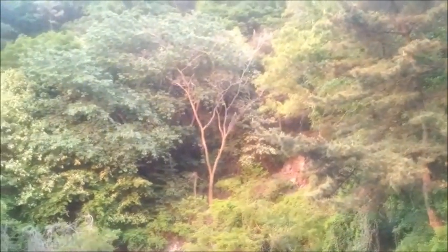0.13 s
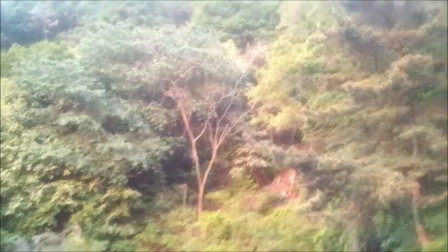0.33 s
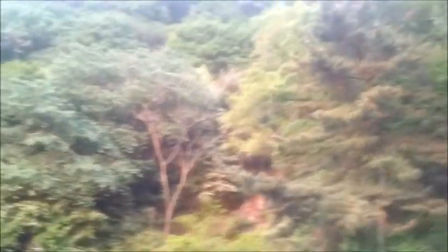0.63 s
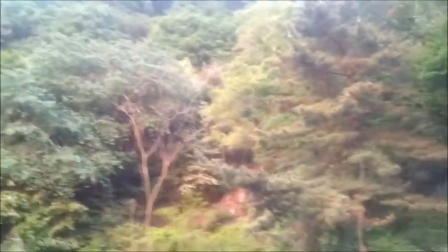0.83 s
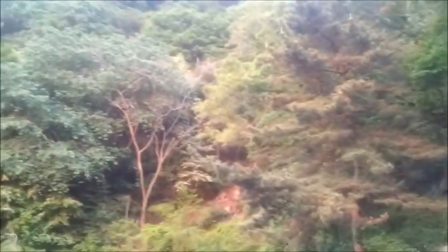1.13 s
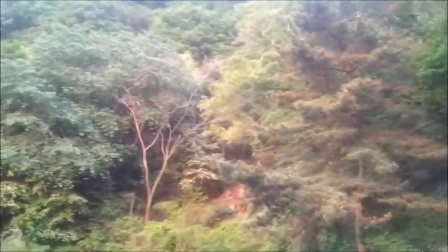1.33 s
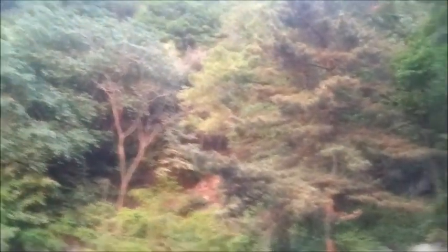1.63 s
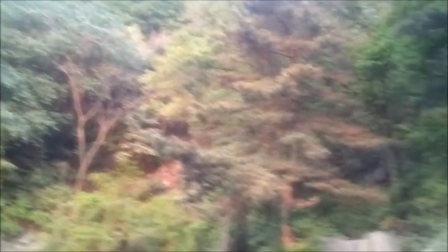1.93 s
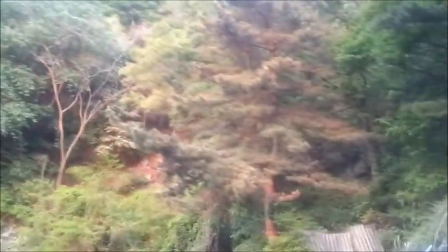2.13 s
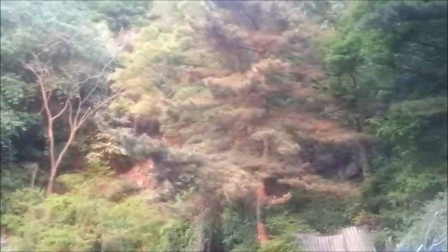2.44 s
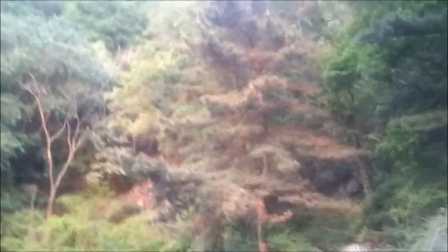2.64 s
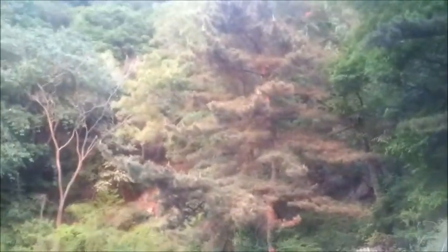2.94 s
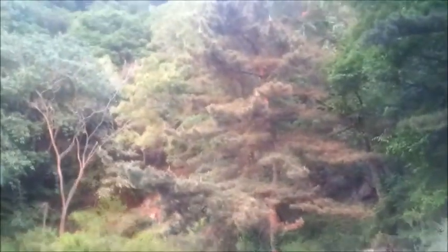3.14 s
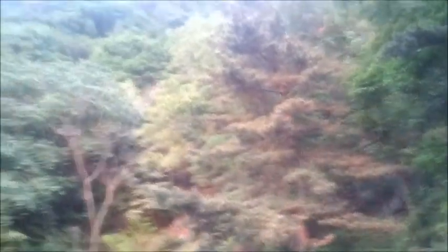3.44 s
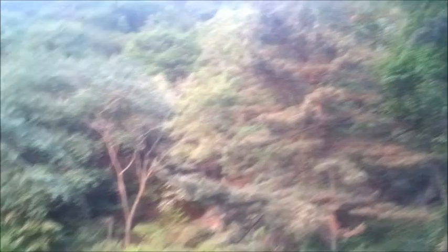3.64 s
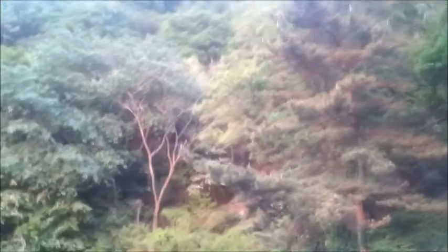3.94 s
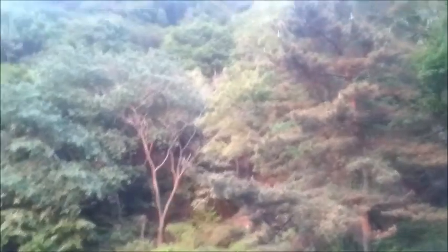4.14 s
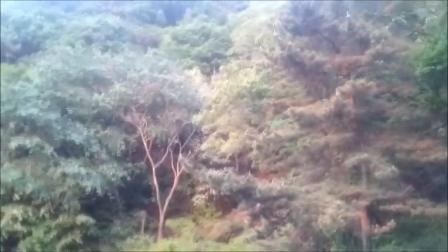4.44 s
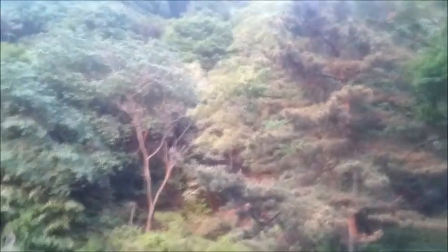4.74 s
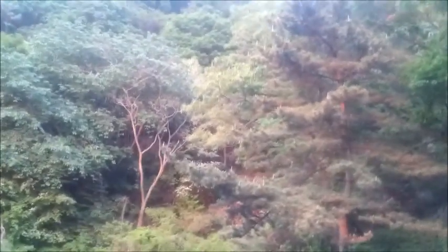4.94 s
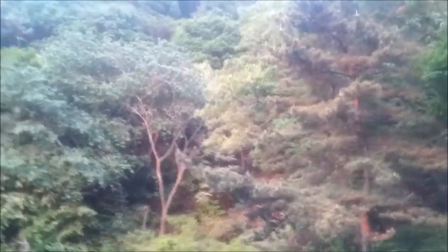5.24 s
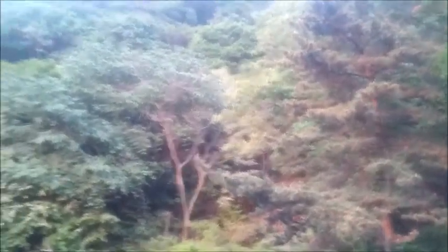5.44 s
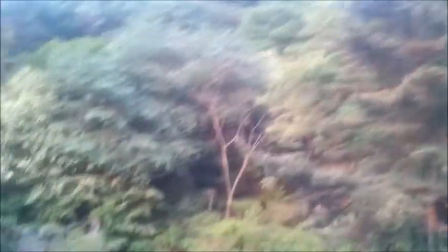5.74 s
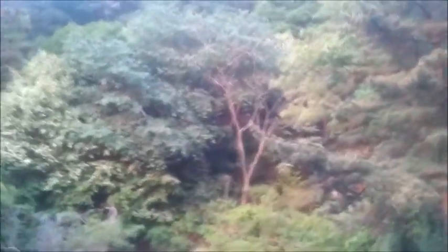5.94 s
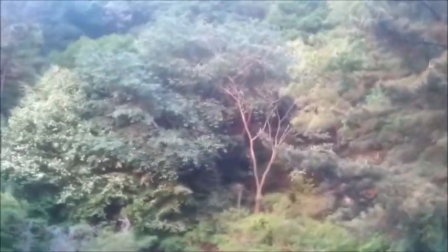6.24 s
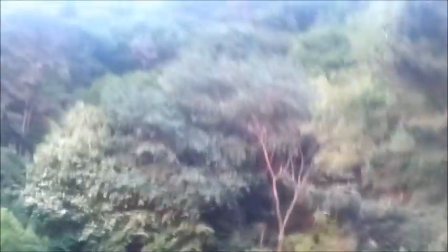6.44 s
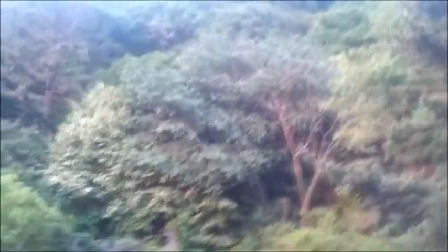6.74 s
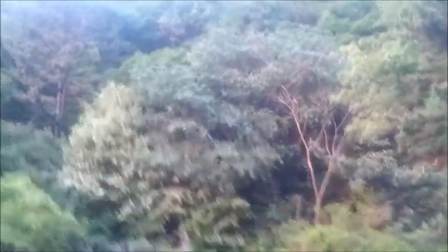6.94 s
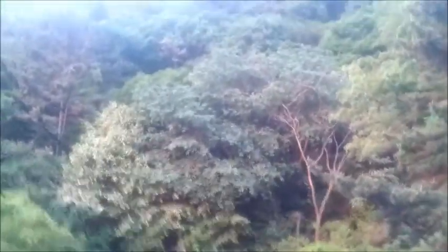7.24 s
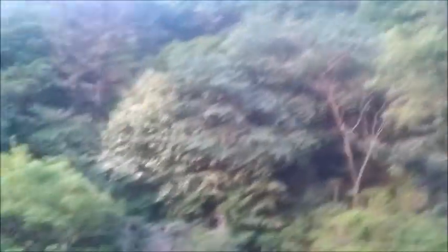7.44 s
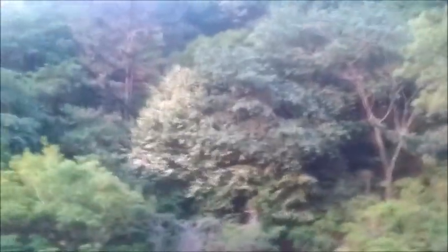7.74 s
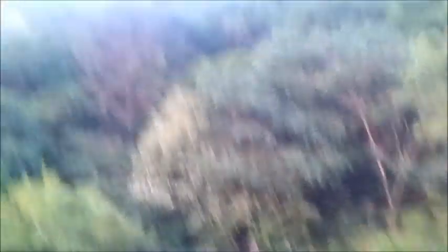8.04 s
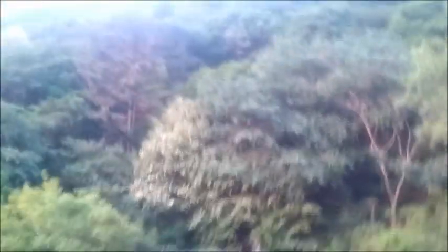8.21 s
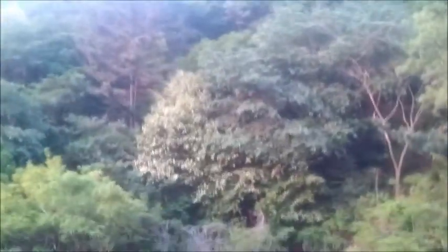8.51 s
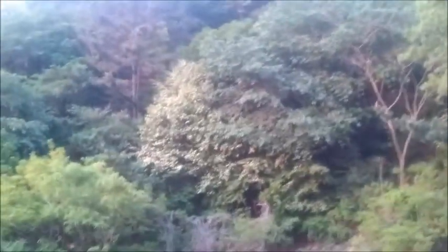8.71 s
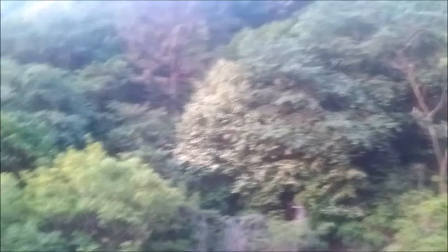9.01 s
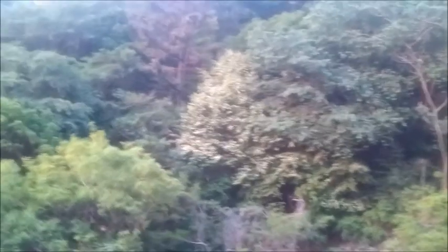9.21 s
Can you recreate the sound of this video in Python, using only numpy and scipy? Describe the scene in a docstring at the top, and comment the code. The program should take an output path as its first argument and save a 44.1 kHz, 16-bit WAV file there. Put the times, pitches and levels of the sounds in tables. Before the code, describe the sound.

Outdoor woodland birdsong through a modest, narrow-sounding handheld microphone. Sharp chirps, sliding whistles and falling slurs overlap, leaving a grainy echo from trunks and leaves. Early on one clear singer repeats its phrase; the middle is sparser with a soft microphone bump; then bright trills burst out above hoarse double scolds and a close tick. Buzzing notes and a faint low rustle end it, over quiet air and distant bird wash.

```python
"""A wooded hillside in the morning, with small birds singing over one another, near and far.
Each note is a gliding whistle or a buzz, scattered by trunks and leaves into a grainy tail.
Under them lie the shaped-noise hush of the valley, a faint drone and the wash of distant birds.
A larger bird scolds in pairs of pulsed-noise rasps; close by come three ticks and a low rustle.
A decaying low sine makes a soft bump on the microphone."""
import sys
import numpy as np
from scipy import signal
from scipy.fft import rfft, irfft, next_fast_len
from scipy.io import wavfile

SR = 44100
rng = np.random.default_rng(int(sys.argv[2]) if len(sys.argv) > 2 else 0)


def transcribe(signal):
    """Save signal, clipped to [-1, 1], as a 16-bit WAV file at the path in sys.argv[1]."""
    frames = np.atleast_2d(signal).T
    limited = np.clip(frames, -1, 1)
    pcm = np.round(limited * 32767).astype(np.int16)
    wavfile.write(sys.argv[1], SR, pcm)


N = 413216
TIME = np.arange(N) / SR


def from_db(db):
    """Decibels to amplitude gain."""
    return 10 ** (np.asarray(db) / 20)


def rms_one(x):
    """Scale to an rms of 1."""
    return x / np.sqrt(np.mean(x ** 2) + 1e-20)


def level(rows):
    """Gain over time, straight in dB between rows of time in seconds and level in dB."""
    return from_db(np.interp(TIME, *np.transpose(rows)))


def band(x, low_hz, high_hz, order=2):
    """Butterworth band-pass."""
    return signal.sosfilt(signal.butter(order, [low_hz, high_hz], "band", fs=SR, output="sos"), x)


def wander(size, rate):
    """Random drift about zero: straight lines between normal draws, `rate` draws a second."""
    steps = np.arange(size) * rate / SR
    return np.interp(steps, np.arange(4096), rng.standard_normal(4096))


def coloured(spectrum):
    """Noise of rms 1, shaped by rows of frequency in Hz and relative density in dB."""
    hz, db = np.transpose(spectrum)
    size = next_fast_len(N)
    bins = np.maximum(np.fft.rfftfreq(size, 1 / SR), 1)
    gain = from_db(np.interp(np.log(bins), np.log(hz), db))
    white = rfft(rng.standard_normal(size))
    return rms_one(irfft(white * gain, size)[:N])


def add(track, s, sound):
    """Mix a sound in at time s, cut off at the end of the track."""
    start = max(0, round(s * SR))
    part = sound[:max(0, N - start)]
    track[start:start + len(part)] += part


def woodland(x, t60, early_t60, late_db, onset_s=0.0051):
    """Near trunks throw back separate echoes; the leafy slope adds a dense tail at late_db beside them."""
    t = np.arange(SR) / SR
    hits = rng.standard_normal(SR) * (rng.random(SR) < 350 / SR)   # about 350 echoes a second
    trunks = hits * from_db(-60 * t / early_t60)
    leaves = rng.standard_normal(SR) * from_db(-60 * t / t60)
    onset = 1 - np.exp(-(t / onset_s) ** 2)
    response = rms_one(trunks * onset) + from_db(late_db) * rms_one(leaves * onset)
    unit_energy = rms_one(response) / np.sqrt(SR)
    return signal.fftconvolve(x, unit_energy)[:N]


def syrinx(pitch, waver, flutter_db, taper):
    """One note of rms 1: a nearly pure tone, a little unsteady in pitch and strength."""
    size = len(pitch)
    phase = 2 * np.pi * np.cumsum(pitch * (1 + waver * wander(size, 300.7))) / SR
    edges = signal.windows.tukey(size, np.clip(taper, .1, 1))
    swell = edges * from_db(flutter_db * wander(size, 120))
    return rms_one(swell * np.sin(phase))


def whistler(notes, waver, flutter_db, taper, rise_db, octave_db, bounce_db, echo_db, t60, early_t60, late_db):
    """Glides a smooth curve through each note's pitches; strength shifts by rise_db in all and octave_db an octave.

    Each note: start in seconds, length in seconds, level in dB, echo in dB, then pitches in Hz at even steps.
    """
    direct, scattered = np.zeros(N), np.zeros(N)
    for s, length, db, wet_db, *pitches in notes:
        along = np.linspace(0, 1, round(length * SR))
        glide = np.polyfit(np.linspace(0, 1, len(pitches)), pitches, len(pitches) - 1)
        pitch = np.polyval(glide, along)
        effort = from_db(rise_db * along + octave_db * np.log2(pitch / pitch.mean()))
        note = from_db(db) * rms_one(effort * syrinx(pitch, waver, flutter_db, taper))
        add(direct, s, note)
        # branches round the perch return the note within milliseconds, so fast sweeps beat against themselves
        for lag in rng.uniform(.002, 0.013, size=2):
            add(direct, s + lag, note * from_db(wet_db + bounce_db))
        add(scattered, s, note * from_db(wet_db + echo_db))
    return direct + woodland(scattered, t60, early_t60, late_db)


def valley():
    """Shaped noise for the low hush and for distant birds blurred into a wash; a narrow noise band for the drone."""
    # Each row: frequency in Hz, relative density in dB.
    hush_spectrum = [(15, -41.5), (25, -10), (76, 0.5), (289, -0.5), (452, -2.5), (549, -4), (2600, -14),
                     (3380, -36.5), (5720, -120)]
    wash_spectrum = [(1500, -16.5), (2400, -6), (3100, 4), (4100, 5.5), (5200, 5), (6300, 2), (7200, -7)]
    # Each row: time in seconds, level in dB; hush and wash are trimmed below.
    hush_course = [(0, -58), (.6, -60), (4, -59.5), (9.37, -60.5)]
    wash_course = [(0, -69), (.85, -72.5), (1.4, -69), (2.5, -70.5), (3.1, -67), (4.3, -68.5), (4.7, -71),
                   (5.75, -71), (6.5, -65.5), (8.2, -66), (9.37, -70)]
    hum_course = [(0, -69.5), (5.5, -71), (7, -84)]
    hum_hz = 442.7
    hush = from_db(1.0) * level(hush_course) * coloured(hush_spectrum)
    hum = level(hum_course) * rms_one(band(rng.standard_normal(N), hum_hz - 9, hum_hz + 9))
    wash = from_db(8.0) * level(wash_course) * coloured(wash_spectrum)
    return hush + hum + wash


def handling():
    """Filtered clicks tick close by, a fast-decaying sine bumps the microphone and a noise band rustles low."""
    # Each row: time in seconds, peak in dB.
    tick_rows = [(0.536, -39), (7.469, -28.5), (8.921, -40)]
    # Low rustle close by. Each row: time in seconds, level in dB.
    rustle_course = [(0, -99), (9.1, -95), (9.24, -58.5), (9.37, -72)]
    bump_s, bump_db, bump_hz, bump_t60_s = 4.797, -40.5, 86, 0.039
    out, t = np.zeros(N), np.arange(SR // 4) / SR
    snap = band(signal.unit_impulse(len(t)), 850, 3200)
    for s, db in tick_rows:
        add(out, s, from_db(db) * snap / np.abs(snap).max())
    add(out, bump_s, from_db(bump_db - 60 * t / bump_t60_s) * np.sin(2 * np.pi * bump_hz * t))
    return out + level(rustle_course) * rms_one(band(rng.standard_normal(N), 240, 380))


def chatter(loudest_db, centre_hz, spread_octaves, count):
    """Birds deep in the wood slur up or down at random and are heard mostly as echo."""
    out = np.zeros(N)
    for k, (when, span, height, slope, soft) in enumerate(rng.random((count, 5))):
        along = np.linspace(-.5, .5, round((.02 + 0.044 * span) * SR))
        glide_octaves = .6 * (slope - .5) + 0.14 * np.sign(slope - .5)   # never level
        octaves = spread_octaves * (height - .5) + glide_octaves * along
        note = syrinx(centre_hz * 2 ** octaves, waver=.015, flutter_db=5.0, taper=0.46)
        s = (k + when) / count * N / SR   # one note in each equal slot
        add(out, s, from_db(loudest_db - 8.3 * soft) * note)
    return from_db(-4.5) * out + woodland(out, t60=0.25, early_t60=0.47, late_db=-5.0)


def buzzers():
    """Far birds swing their pitch about a hundred times a second; much of it arrives as echo."""
    # Each row: start in seconds, length in seconds, level in dB before the direct and echo trims,
    # start pitch in Hz, end pitch in Hz, swing to either side in Hz, swings per second.
    buzz_rows = [(2.015, 0.11, -52.5, 4054, 4920, 420, 115), (2.05, 0.16, -55.5, 5430, 5920, 480, 146),
                 (4.247, 0.18, -56.5, 5130, 4980, 600, 82), (6.278, .16, -52, 4230, 4590, 360, 150),
                 (6.404, 0.089, -48, 4500, 4680, 340, 135), (6.336, 0.21, -51.5, 5270, 6000, 585, 88),
                 (8.564, 0.16, -43.5, 5225, 4654, 190, 146), (8.766, .195, -43, 5030, 4894, 220, 147),
                 (9.011, .14, -45, 5080, 4910, 250, 153), (9.182, 0.036, -41.5, 5170, 5020, 190, 125),
                 (9.225, 0.083, -43, 4987, 5045, 252, 127), (9.332, 0.041, -47.5, 5220, 5100, 220, 130)]
    out = np.zeros(N)
    for s, length, db, start_hz, end_hz, swing_hz, rate in buzz_rows:
        size = round(length * SR)
        cycle = 2 * np.pi * np.cumsum(rate * (1 + 0.061 * wander(size, 60))) / SR
        pitch = np.linspace(start_hz, end_hz, size) + swing_hz * np.sin(cycle)
        pulsing = from_db(-4 * np.cos(cycle))   # each down-stroke is the loud half of a swing
        note = rms_one(pulsing * syrinx(pitch, waver=0.0091, flutter_db=3.5, taper=0.2))
        add(out, s, from_db(db) * note)
    return from_db(-5.5) * out + from_db(-2.5) * woodland(out, t60=0.72, early_t60=0.65, late_db=0.0)


def rasps():
    """A larger bird scolds in pairs of hoarse bursts: band-limited noise pulsing 330 times a second."""
    # Each row: start of a pair in seconds, level of its second burst in dB.
    rasp_pairs = [(7.365, -56.5), (7.608, -58), (7.853, -57), (8.1, -57)]
    burst_s, gap_s, first_burst_db = 0.035, .058, -2.5
    out, t = np.zeros(N), np.arange(round(burst_s * SR)) / SR
    pulses = 1 + np.cos(2 * np.pi * 330 * t)
    edges = signal.windows.tukey(len(t), .5)
    for s, db in rasp_pairs:
        for after, gain_db in ((0, first_burst_db), (gap_s, 0)):
            air = rng.standard_normal(len(t)) * pulses * edges
            add(out, s + after, from_db(db + gain_db) * rms_one(band(air, 1450, 2640, order=3)))
    return out + woodland(out, t60=0.98, early_t60=0.31, late_db=-5.0)


def far_calls():
    """Notes of two far birds with two-note calls: one slips down very high, one whistles low and level."""
    # Thin high pairs. Each row: start in seconds, level in dB before the mix.
    slip_rows = [(.409, -61.5), (.813, -58), (1.252, -57.5), (1.698, -59), (2.16, -62), (6.22, -66.5)]
    # Low calls. Each row: start in seconds, level in dB before the note gain and the mix.
    low_calls = [(.458, -60), (5.385, -68)]
    # Notes of a low call. Each row: delay in seconds, gain in dB, pitch in Hz.
    low_call_notes = [(0, 3, 1967), (.086, 2, 2430)]
    slip_gap_s, slip_s, slip_echo_db, slip_hz = 0.032, .022, 0.5, (7380, 6900, 6080)
    low_note_s, low_echo_db = 0.055, -7
    notes = []
    for s, db in slip_rows:
        for k in range(2):
            notes.append((s + k * slip_gap_s, slip_s, db, slip_echo_db, *slip_hz))
    for s, db in low_calls:
        for after, gain_db, hz in low_call_notes:
            notes.append((s + after, low_note_s, db + gain_db, low_echo_db, hz, hz))
    return notes


def chorus():
    """Single notes from all over the slope: each bends its kind's shape between its own two pitches."""
    # Each row: start in seconds, length in seconds, level in dB, echo in dB, first and second pitch in Hz.
    arched_chips = [(2.423, .038, -45, -5.5, 3730, 3940), (2.477, 0.03, -45.5, -9.5, 3900, 4760),
                    (2.797, 0.029, -46, -8, 4120, 4860), (3.096, 0.035, -47, -9, 4140, 4790),
                    (5.997, .033, -48, -5, 3910, 4760), (7.4, .026, -44, -0.5, 4260, 4760),
                    (7.915, .068, -55, -9, 4690, 5210), (8.247, 0.069, -56, -6, 3950, 5010)]
    dipping_whistles = [(2.384, .062, -52, -3.5, 3860, 3670), (3.986, 0.064, -49.5, -3, 4140, 3920),
                        (5.799, 0.047, -52.5, -4.5, 4850, 4670), (5.89, .036, -47, -14, 6450, 6050),
                        (6.428, 0.04, -45.5, -12.5, 6040, 5780), (9.232, 0.032, -58, -6, 6020, 5600)]
    upward_sweeps = [(0.222, .053, -65, -8, 3430, 4170), (0.425, .057, -52, -8, 5350, 5980),
                     (0.614, 0.032, -53, -2.5, 3950, 4850), (0.922, .014, -45.5, -3, 5300, 6270),
                     (1.956, 0.036, -49, -5, 4150, 4750), (2.227, 0.05, -51, -17.5, 5290, 5590),
                     (3.09, 0.024, -52.5, -10.5, 5420, 5920), (3.145, .03, -57, -14, 5200, 5650),
                     (3.259, 0.012, -61, -11, 4700, 5940), (3.295, .013, -58, -5, 4780, 5970),
                     (4.073, .013, -57.5, -5, 5010, 5920), (4.245, .026, -61, -6, 5800, 6170),
                     (4.796, 0.037, -45, -6, 3510, 4410), (4.797, .02, -58, -2, 2850, 3430),
                     (5.709, 0.078, -68, 4, 4400, 5720), (9.267, 0.0293, -60, -7, 5640, 6140),
                     (5.837, 0.044, -55, -6, 4700, 6600), (7.807, .052, -63.5, 5, 3860, 4670)]
    falling_slurs = [(1.759, .047, -44.5, -5.5, 5570, 4280), (3.115, .093, -65.5, -7.5, 2060, 1550),
                     (3.423, 0.067, -50.5, -3, 5600, 4410), (3.613, 0.073, -49.5, -1, 5410, 4480),
                     (4.95, 0.12, -62.5, -7, 4280, 3690), (5.247, 0.061, -65, -6, 7700, 6900),
                     (5.299, 0.0414, -57.5, -8.5, 6780, 6380), (6.025, .035, -56, 0, 4600, 3650),
                     (6.049, 0.038, -58, -4.5, 5570, 4950), (6.114, 0.043, -55.5, -3, 6210, 5590),
                     (6.739, 0.023, -59, 3.5, 4470, 3470), (8.487, .13, -66, -6.5, 2180, 1533)]
    straight_whistles = [(.006, 0.04, -54, -9.5, 5940, 6130), (0.872, .025, -48.5, -7, 5300, 5560),
                         (1.463, .03, -49.5, -5.5, 5370, 5690), (1.49, 0.029, -46.5, -10, 5900, 6130),
                         (1.583, 0.011, -43, -2.5, 5720, 5880), (1.835, 0.12, -61, 0, 4470, 3400),
                         (2.351, 0.044, -55, -1.5, 4310, 3960), (2.46, 0.077, -64.5, -3, 2870, 2760),
                         (2.492, 0.049, -67.5, -7, 1480, 1466), (2.741, 0.028, -55, 3, 4000, 4250),
                         (3.04, 0.025, -57.5, -7, 6100, 6050), (3.041, 0.033, -54, -2.5, 4260, 4160),
                         (3.084, 0.019, -57.5, -9, 2860, 2740), (3.167, 0.066, -60.5, 1.5, 4250, 4130),
                         (4.061, 0.042, -51.5, -11, 4060, 3940), (4.824, .073, -48.5, -9, 4276, 4450),
                         (5.171, .14, -68, -10, 4020, 3980), (5.573, 0.031, -56.5, -15, 5920, 5880),
                         (5.808, .018, -56, -3, 5530, 5400), (5.986, .022, -54, -14, 5830, 5910),
                         (6.596, 0.14, -64, -4.5, 4310, 4200), (7.51, 0.015, -54, -4, 3170, 3170),
                         (8.01, 0.22, -63, -3.5, 4420, 4200), (8.377, 0.18, -60.5, -3.5, 4065, 4320),
                         (8.623, .046, -49.5, -14, 4230, 4330), (8.94, .04, -52, -8.5, 5350, 5500),
                         (9.077, 0.039, -59, -10, 4050, 3800), (9.282, 0.018, -57, -3, 4000, 4160)]
    # Quick dropping ticks. Each row: start in seconds, level in dB, start pitch in Hz.
    drop_rows = [(.399, -61.5, 3300), (2.892, -45.5, 3654), (2.92, -47, 3870), (3.113, -46.5, 3905),
                 (3.125, -52, 3600), (3.505, -49.5, 4420), (3.693, -44, 4500), (4.044, -49, 4210),
                 (4.087, -53.5, 4130), (4.15, -51.5, 4170), (6.155, -45.5, 5690), (6.172, -51.5, 4430),
                 (6.262, -54.5, 4550), (9.195, -61.5, 4100)]
    drop_s, drop_echo_db, drop_ratio = .017, -4.5, .79
    drops = [(s, drop_s, db, drop_echo_db, hz, drop_ratio * hz) for s, db, hz in drop_rows]
    # each shape: share of the way from the first pitch to the second, at even steps
    kinds = [((0.093, 1, 0.98, .25), arched_chips), ((0, 0.97, 1, -.2), dipping_whistles),
             ((0, .32, .72, 1), upward_sweeps), ((0, .52, .8, 1), falling_slurs),
             ((0, 1), straight_whistles), ((0, .18, .58, 1), drops)]
    notes = []
    for shape, rows in kinds:
        for *note, first_hz, second_hz in rows:
            notes.append((*note, *(first_hz + (second_hz - first_hz) * np.array(shape))))
    return notes


def swelling_whistle():
    """The one note of a long whistle that climbs, then sinks back."""
    # In order: start in seconds, length in seconds, level in dB, echo in dB, five pitches in Hz at even steps.
    long_note = (2.533, .238, -44, -10, 2810, 3005, 3465, 3510, 3100)
    return [long_note]


def trills():
    """Notes of each run, on its own beat: four climbing arches, a held note, three low drops."""
    # Each row: start in seconds, beat in seconds, base level of the arches in dB before the mix,
    # base top of the first arch in Hz, level of the held note in dB before the mix, its middle pitch in Hz.
    trill_rows = [(6.73, 0.03, -37, 5400, -37.5, 4800), (7.074, 0.031, -36.5, 5420, -38, 4590),
                  (7.428, .0327, -41, 5400, -45.5, 4540)]
    arch_accents_db, foot_hz, arch_s, echo_db = (-3.5, -0.8, 0, -3), 3674, 0.025, -1
    top_climb_hz, foot_climb_hz = 131, 191   # from arch to arch
    uneven_db, uneven_hz = 3, 69.7   # random spread from arch to arch
    hold_beat, hold_s, ending_beat, ending_step_beats = 3.85, .034, 5.85, 1.11
    ending_accents_db, ending_s = (-6.5, -6.5, -11.5), .022
    ending_hz, ending_climb_hz = (3430, 3443, 3255, 2914, 2530), 69.4   # climb from drop to drop
    notes = []
    for s, beat, db, top_hz, hold_db, hold_hz in trill_rows:
        for k, accent_db in enumerate(arch_accents_db):
            stray_db, stray_hz = rng.standard_normal(2) * (uneven_db, uneven_hz)
            foot = foot_hz + k * foot_climb_hz
            top = top_hz + k * top_climb_hz + stray_hz
            flank = foot + .57 * (top - foot)
            notes.append((s + k * beat, arch_s, db + accent_db + stray_db, echo_db,
                          foot, flank, top, flank, foot))
        notes.append((s + hold_beat * beat, hold_s, hold_db, echo_db, 1.02 * hold_hz, .98 * hold_hz))
        for k, accent_db in enumerate(ending_accents_db):
            drop_start = s + (ending_beat + k * ending_step_beats) * beat
            drop_hz = np.array(ending_hz) + k * ending_climb_hz
            notes.append((drop_start, ending_s, hold_db + accent_db, echo_db, *drop_hz))
    return notes


def bold_song():
    """A motif sung twice, followed first by a quickening, sinking rattle of four notes, then by two sinking notes."""
    # Each row: delay in seconds, length in seconds, level in dB before the motif's gain, echo in dB,
    # start, middle and end pitch in Hz.
    motif_notes = [(0, .036, -35.5, -3, 5350, 5357, 5410), (0.031, .023, -41, .5, 7610, 6550, 6000),
                   (.063, 0.025, -39, 3, 4400, 4695, 4510), (0.073, .048, -43, -3, 4370, 3580, 3370),
                   (.136, .031, -36.5, -4.5, 3620, 3990, 3560)]
    # Each row: start in seconds, gain in dB.
    motif_starts = [(0.909, -1.5), (1.347, -1.5)]
    # Each row: start in seconds, level in dB, first gap in seconds, notes (rounded to a whole count).
    rattle_rows = [(1.141, -32, .03, 4.26), (1.59, -35, .026, 2)]
    # Pitches in Hz at even steps through the first note of each row above.
    rattle_hz = (5300, 5886, 5400, 4850)
    note_s, gap_ratio, sag_hz, last_db, echo_db = .0145, .86, 38, -4, 1.6   # sag from note to note
    notes = []
    for start, gain_db in motif_starts:
        for after, length, db, *rest in motif_notes:
            notes.append((start + after, length, db + gain_db, *rest))
    for s, db, gap, count in rattle_rows:
        for k in range(round(count)):
            last = k == round(count) - 1
            notes.append((s, note_s, db + last * last_db, echo_db, *(np.array(rattle_hz) - k * sag_hz)))
            s += gap * gap_ratio ** k
    return notes


def scene():
    """Each group of singers gets its own voice and its own echoes, over the valley."""
    far = whistler(far_calls(), waver=0.012, flutter_db=0.5, taper=0.14, rise_db=-3.0, octave_db=5.0,
                   bounce_db=-14, echo_db=0.0, t60=0.28, early_t60=0.42, late_db=-3.0)
    warble = whistler(chorus(), waver=0.01, flutter_db=1.0, taper=0.23, rise_db=-0.5, octave_db=8.0,
                      bounce_db=-10.0, echo_db=6.0, t60=1.0, early_t60=0.35, late_db=-0.5)
    whistle = whistler(swelling_whistle(), waver=0.0054, flutter_db=0.8, taper=0.086, rise_db=8.0, octave_db=6.0,
                       bounce_db=-6.5, echo_db=7.0, t60=1.0, early_t60=.3, late_db=2.0)
    trill = whistler(trills(), waver=0.018, flutter_db=5.0, taper=0.33, rise_db=-2.5, octave_db=3,
                     bounce_db=-6.5, echo_db=2.4, t60=0.64, early_t60=0.35, late_db=2.5)
    song = whistler(bold_song(), waver=0.0098, flutter_db=1.0, taper=0.15, rise_db=2.5, octave_db=-6.5,
                    bounce_db=-7.5, echo_db=0.0, t60=0.62, early_t60=0.44, late_db=1.0)
    deep_wood = chatter(loudest_db=-62, centre_hz=4500, spread_octaves=.8, count=120)
    background = valley() + handling() + deep_wood + buzzers() + rasps() + from_db(-2.5) * far
    return (background + warble + whistle + from_db(-0.76) * trill + song)[None]


def record(dry):
    """A narrow-band recorder: bass and top are cut, a faint mirror of the treble folds above the cut, and it hisses."""
    top_hz, mirror_rate_hz, cutoff_hz = 7267, 16000, 15400
    narrow = signal.sosfilt(signal.butter(20, top_hz, fs=SR, output="sos"), dry)
    narrow = signal.sosfilt(signal.butter(4, 42, "high", fs=SR, output="sos"), narrow)
    # multiplying by a cosine flips the spectrum: f lands on the mirror rate minus f
    mirror = from_db(-23) * narrow * 2 * np.cos(2 * np.pi * mirror_rate_hz * TIME)
    mirror = signal.sosfilt(signal.ellip(10, .5, 70, 9800, fs=SR, output="sos"), mirror)
    hiss = from_db(-91.5) * rng.standard_normal(N)
    return signal.sosfilt(signal.ellip(8, .2, 70, cutoff_hz, fs=SR, output="sos"), narrow + mirror + hiss)


dry = scene()
out = record(dry)
transcribe(out)
```